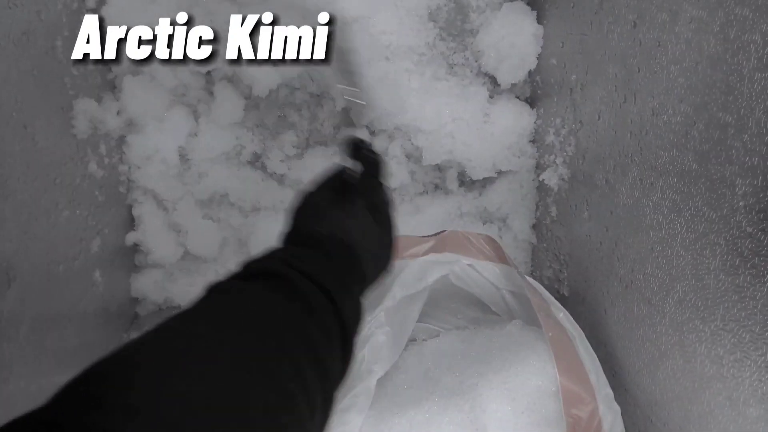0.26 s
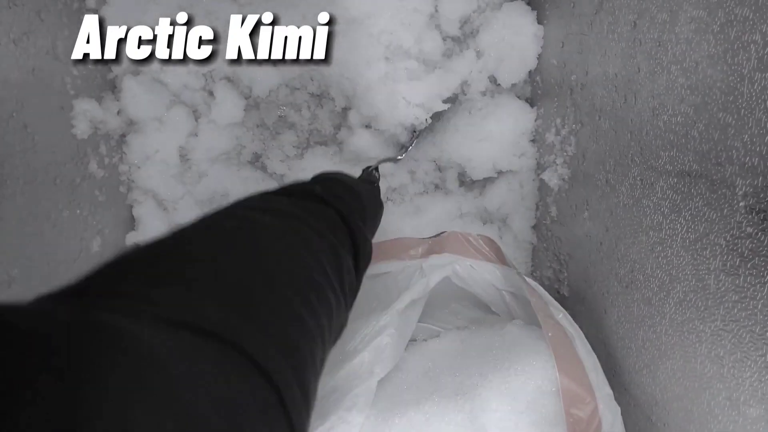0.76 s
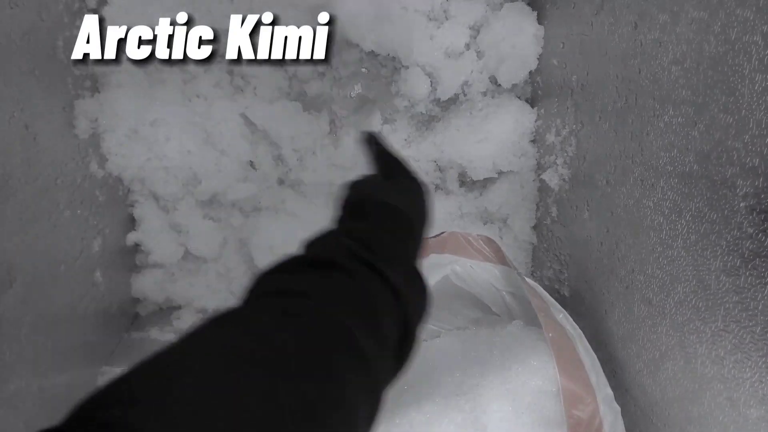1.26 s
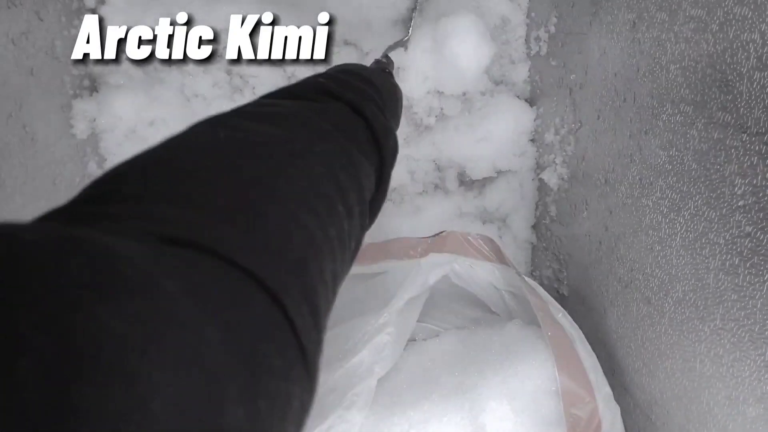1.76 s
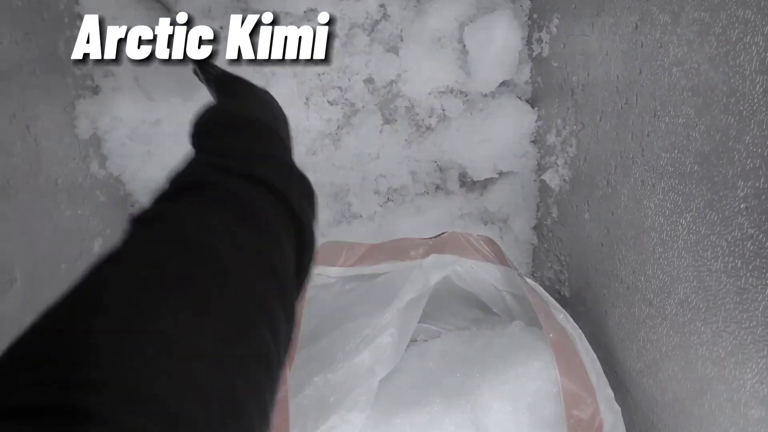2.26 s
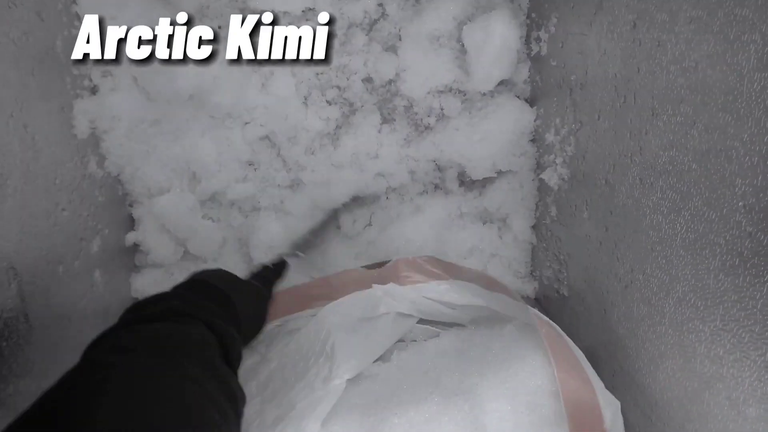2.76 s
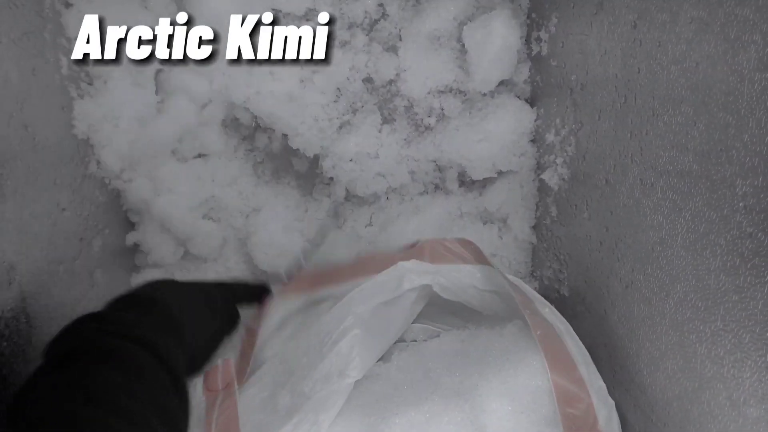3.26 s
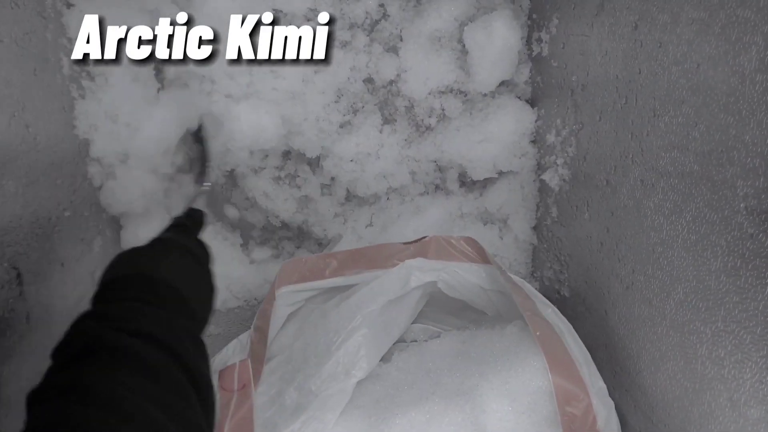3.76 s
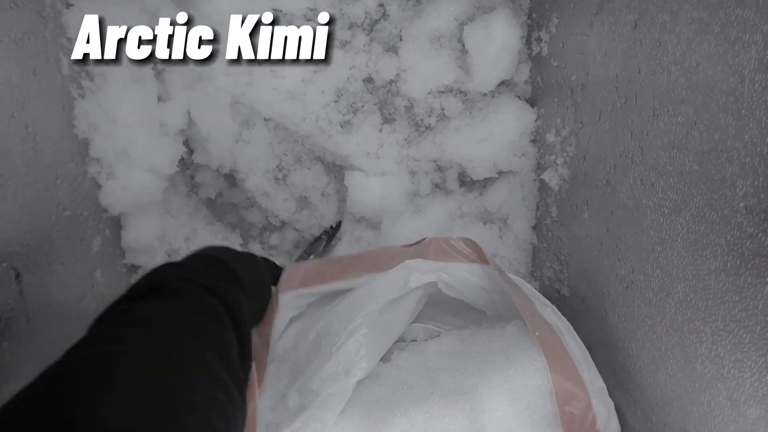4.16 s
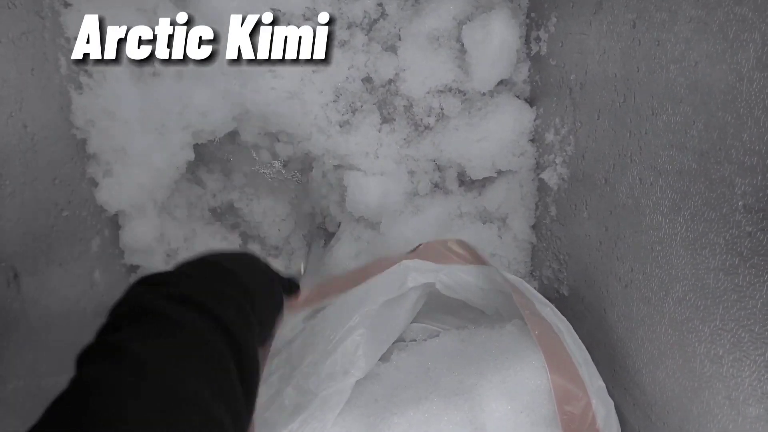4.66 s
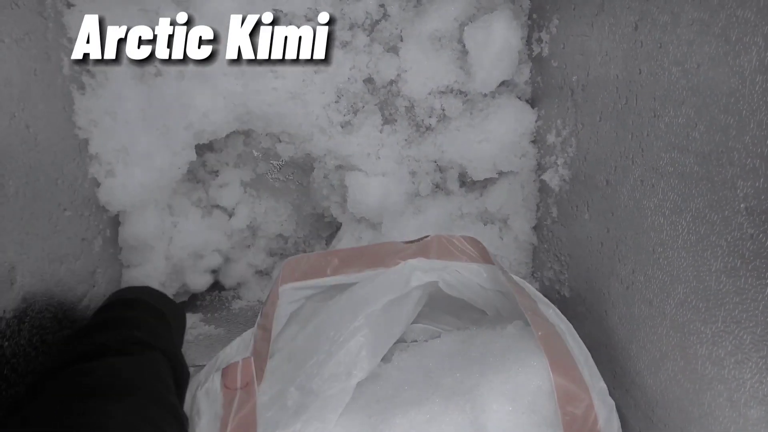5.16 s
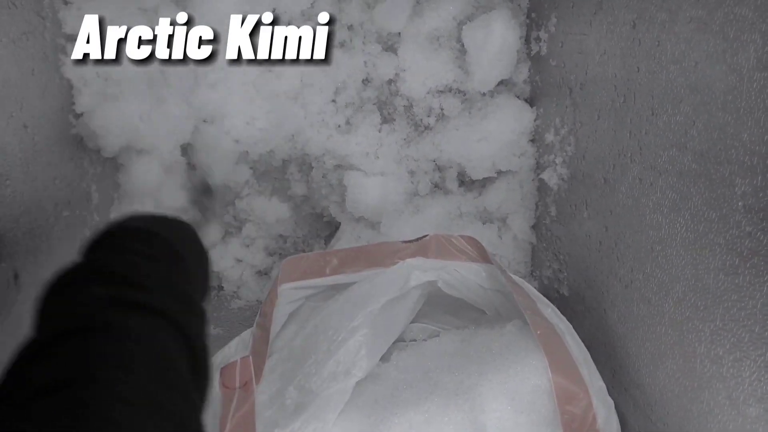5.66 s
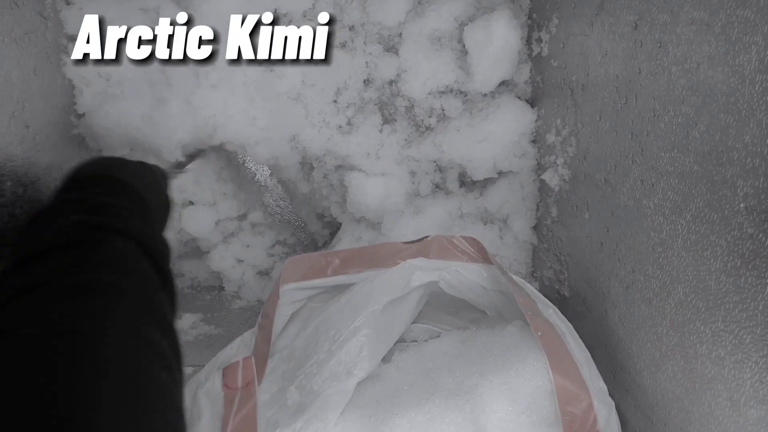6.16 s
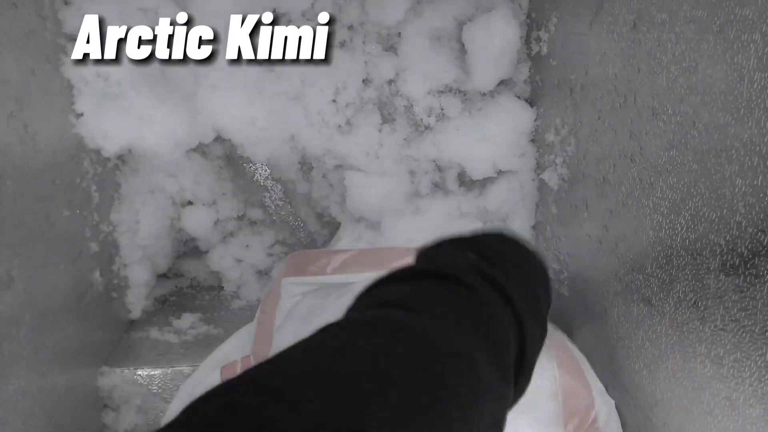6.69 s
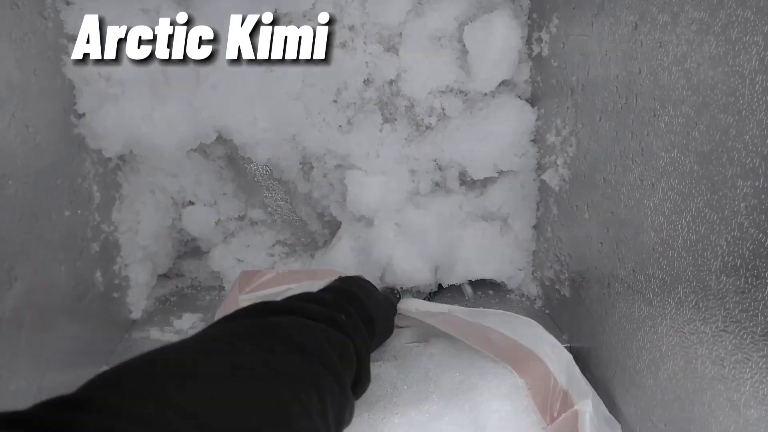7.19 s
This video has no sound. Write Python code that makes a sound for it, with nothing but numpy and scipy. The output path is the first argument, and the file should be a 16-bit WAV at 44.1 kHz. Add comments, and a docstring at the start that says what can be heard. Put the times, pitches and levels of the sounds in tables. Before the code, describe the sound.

Close stereo, inside a small hard-walled freezer with quiet room hiss and low handling rumble. From 0 to about 2.5 seconds a steel spoon scrapes frost off hard walls in fast uneven strokes: bright gritty hiss, fine snapping crumbs, hollow boxy knocks, low panel thumps, and short faint metallic rings around 0.7, 1.4 and 1.7. From 2.6 the spoon digs looser frost, with a long crisp scrape near 3 and a sharp crack with a knock around 3.5. Heavy crunching and a strong deep boom come at 4.2, another boom just before 5, then a hard crunching stroke at 5.1. Between 5.3 and 6.2 strokes continue with cracks and dull knocks; 6.3 to 6.7 is lighter, mostly small ticks. A clacking knock at 6.7 leads to the loudest bright ice cracks around 6.8 to 7.0, and crunchy scraping to the end, about 7.4.

```python
"""Inside a chest freezer, close to a two-port microphone, a steel spoon scrapes and digs thick frost.
Crystals crush in a dense hiss of grains, crumbs snap as short damped tones, lumps crunch and ice cracks
in decaying noise bursts. Knocks ring modes of the box air and lining, and the spoon rings faintly.
Shoves set the low wall panel booming over a rumble of handling and a quiet room; a limiter holds the peaks."""
import sys
import numpy as np
from scipy import signal
from scipy.fft import rfft, irfft, next_fast_len
from scipy.io import wavfile
from scipy.ndimage import uniform_filter1d, minimum_filter1d, map_coordinates

SR = 44100
rng = np.random.default_rng(int(sys.argv[2]) if len(sys.argv) > 2 else 0)


def unload_audio(sound):
    """Save the sound as a 16-bit wav file, at the path given as the first command line argument."""
    columns = np.transpose(np.atleast_2d(sound))
    # keep every value between -1 and 1, then stretch to whole-number steps
    steps = np.round(np.clip(columns, -1, 1) * 32767)
    wavfile.write(sys.argv[1], SR, steps.astype(np.int16))


N = 327663

# relative noise spectra of the room and of handling: pitch_hz, density_db
ROOM_SPECTRUM = [(15, -33), (25, -26), (258, -1), (410, -9), (705, -6.5), (1930, -47), (4720, -22),
                 (8810, -64), (15200, -10.5), (16500, -36)]
HANDLING_SPECTRUM = [(12, -57), (20, -48), (54, -8), (75, -6), (98, -19), (160, -120)]
ROOM_DB = -46
# shoves that set the wall panel booming: full_s, peak_db, pitch_hz, hold_s
SHOVES = [(0.002, -15, 87, 0.015), (0.113, -17, 86, 0.042), (0.288, -31, 90, 0.025),
          (0.501, -14, 91.5, 0.042), (0.583, -18, 89.4, 0.03), (0.615, -18.5, 91, 0.026),
          (0.74, -12.5, 94.2, 0.014), (0.937, -27.5, 93.6, 0.034), (1.018, -21.9, 91.7, 0.023),
          (1.105, -16.5, 93.3, 0.066), (1.2, -27, 90.3, 0.04), (1.35, -36, 81.8, 0.026),
          (1.52, -23.5, 93, 0.021), (1.59, -27, 92, 0.016), (1.777, -20.3, 89.4, 0.02),
          (1.899, -32.5, 88.8, 0.022), (1.977, -21, 91.4, 0.025), (2.178, -14.5, 89, 0.025),
          (2.313, -20, 88.8, 0.013), (2.464, -28.6, 94, 0.023), (2.707, -23.4, 92, 0.044),
          (2.796, -19, 99.4, 0.021), (2.89, -16, 94.8, 0.02), (2.943, -23.5, 91, 0.041),
          (3.11, -28.5, 87.7, 0.077), (3.267, -28.5, 88.6, 0.021), (3.43, -20.5, 92.3, 0.021),
          (3.552, -23, 96.7, 0.024), (3.634, -33, 89.8, 0.02), (3.71, -15.5, 86.7, 0.011),
          (3.793, -23.5, 90.2, 0.042), (3.916, -21.6, 89.6, 0.033), (4.032, -25.9, 90.7, 0.025),
          (4.108, -15.5, 89.6, 0.031), (4.227, -4.5, 94.5, 0.026), (4.309, -14, 94, 0.027),
          (4.383, -18.5, 96, 0.023), (4.451, -23.5, 89.6, 0.092), (4.773, -24.2, 89.8, 0.037),
          (4.962, -5, 88.8, 0.065), (5.233, -23.5, 92, 0.031), (5.36, -30, 87.1, 0.016),
          (5.506, -19.1, 90.9, 0.039), (5.645, -26.4, 90.3, 0.021), (5.845, -28, 90.5, 0.037),
          (5.955, -23, 89.5, 0.031), (6.088, -13, 99.3, 0.019), (6.182, -23, 93, 0.038),
          (6.322, -34, 89.2, 0.047), (6.741, -30, 86.9, 0.026), (6.828, -27, 85.3, 0.017),
          (7.022, -24, 94.5, 0.023), (7.101, -25.2, 92.1, 0.021), (7.189, -20.8, 92.8, 0.021),
          (7.301, -25, 80.0, 0.023)]
SHOVE_SWELL_S, SHOVE_FADE_S, PANEL_REST_DB = 0.018, 0.081, -45.5

# knocks on the lining: start_s, air_peak_db, favoured_pitch_hz, clack_db (over the air peak)
KNOCKS = [(0.066, -5.5, 330, -20), (0.089, -2.5, 300, -30), (0.495, -1.5, 280, -20), (0.515, -8, 286, -41),
          (0.738, -5.5, 260, -12), (0.877, -15.5, 268, -27), (1.1, -0.5, 238, -29), (1.112, -8, 292, -35),
          (1.51, -6, 277, -20.5), (1.534, -9.5, 258, -32), (1.725, -5, 238, -17.5), (2.139, -4.5, 295, -13),
          (2.163, -1.5, 260, -34.5), (2.33, -19, 271, -25), (2.43, -3.5, 325, -20), (2.785, -9, 114.3, -31),
          (3.076, -12.5, 261, -37), (3.221, -16.5, 263, -26), (3.47, -8.5, 519, -33),
          (3.531, -0.5, 510, -48), (4.088, -11, 157.6, -32), (4.219, -4, 116, -36), (4.286, -7, 116.6, -33),
          (4.312, -8, 116, -30), (4.349, -6, 268, -31), (4.395, -6, 406, -31), (4.763, -9, 480, -22),
          (4.892, -8, 429, -25), (4.934, -0.5, 264, -28), (5.082, -10.5, 312, -20), (5.459, -4, 373, -38),
          (5.59, -10, 253.4, -16.5), (5.938, -7.5, 485, -39), (6.086, -4.5, 116.3, -37),
          (6.123, -6.5, 298, -32), (6.145, -6.5, 248, -33), (6.17, -5.5, 536, -30), (6.727, -6, 360, -5.5),
          (6.816, -2, 510, -29), (7.097, -8, 520, -17)]
# air modes of the box, ringing freely: pitch_hz, level_db, free_t60_s
BOX_MODES = [(125, 0, 0.1), (154.6, -5, 0.13), (255.4, 0, 0.11), (292.7, -3, 0.13), (384.2, -1, 0.095),
             (524.5, 4, 0.062), (706, -4, 0.11), (917, 4, 0.057)]
# modes of the thin lining: pitch_hz, level_db, t60_s
LINING_MODES = [(1606, 15, 0.037), (2905, 6, 0.023)]
DAMPED = .85  # frost and glove shorten the ring of the box to this share of a free ring

# the spoon is jarred free and rings: start_s, level_db (added to that of each mode)
TINKS = [(0.5526, -43), (0.575, -32), (0.6587, -22), (1.3653, -18.5), (1.7105, -18), (4.767, -23),
         (6.762, -32), (6.9163, -32)]
# modes of the spoon: pitch_hz, level_db, t60_s
SPOON_MODES = [(4020, -23, 0.071), (5170, -5, 0.066), (7000, 4, 0.052), (9970, -5, 0.064),
               (12960, 9, 0.044)]

# ice cracks: start_s, level_db, body_db (over level), chip_pitch_hz, chip_db (over level)
CRACKS = [(0.1955, -26, -28, 2500, 28), (0.345, -17.5, -29, 6300, 10), (0.488, -18.5, 7.5, 2870, 13),
          (0.62, -23, 5.5, 1820, 2), (0.771, -23.5, 2, 6040, 8), (0.8303, -22, -20, 5300, -1),
          (0.8834, -21, -12, 2710, 12), (1.2993, -34, -18, 6500, 16.5), (1.367, -25.5, -30, 7520, 14.5),
          (1.427, -19, -33, 6740, 9), (1.478, -13.5, -9, 1820, 9.5), (1.497, -15.5, -13, 3450, 12),
          (1.508, -22.5, -7, 1760, 24.5), (1.5496, -18, -2.5, 1992, 11), (1.965, -19, -20, 5340, 12),
          (2.0981, -16, -20, 6390, 9), (2.4301, -18, -18, 3730, 11), (2.47, -31.5, -20, 4945, 1),
          (3.093, -14.5, -32, 2240, 14), (3.1683, -22, -24, 2265, 15.5), (3.386, -25.5, 11.5, 6500, 21),
          (3.471, -9.5, 9, 2890, 9), (3.533, -22, 16, 6110, 8), (3.5666, -12, -4, 4030, -2),
          (3.641, -17, -19, 4500, 19), (4.1497, -15, 4, 2870, 11), (4.2861, -17.5, 5, 1868, 9),
          (4.3137, -23.5, 4.5, 2435, 16), (4.5206, -21, -11, 3084, 17), (4.6092, -20, -30, 6350, 15.5),
          (4.6794, -18, -23, 6650, 6.5), (4.6986, -30, -26, 6300, 2), (4.7659, -17, 6, 4060, 7),
          (4.87, -22.5, 14, 3260, 9), (5.3627, -24, 12.5, 6520, -5), (5.557, -31, -25, 3974, 7),
          (5.5898, -10, -20, 2555, 9), (5.645, -21, -1, 2500, 4), (5.9387, -16.5, 2, 6580, 9.5),
          (6.384, -30, -30, 5000, 7), (6.4396, -24.5, -4.5, 2270, 3), (6.4819, -26, -30, 5030, -1.5),
          (6.548, -33, -27, 5000, -9), (6.7256, -17.5, 4, 2674, 1), (6.76, -32, -20, 5100, 6),
          (6.8116, -10, -2, 3080, 9), (6.933, -6, 9, 2920, 18), (6.9722, -11, 5, 1800, 12),
          (7.0114, -14, 12, 2490, 11), (7.1013, -18, 7, 1800, 15)]
SPLIT_T60, SHOWER_T60 = 0.012, 0.051  # s: the first sharp split, the shower of chips after it
CHIP_OCTAVES = 0.21  # half width of the band in which a chip sounds

# strokes of the spoon, from hard digs to light brushing: full_bite_s, swell_s, hold_s, fade_s,
# hiss_db (crystals), crunch_db (lumps), drag_db (on the lining), sizzle_db (over the hiss)
STROKES = [ (0.0, .01, 0.054, 0.18, -14.5, -26.5, -34, -0.5), (.25, 0.23, .01, 0.26, -22.5, -33, -30, 7),
           (.555, .006, 0.0028, 0.05, -24, -26.5, -23, 4.5), (.7, 0.082, .03, 0.043, -14, -26, -24, 1),
           (.77, 0.018, 0.07, .02, -39, -43, -42, 15), (.886, 0.0073, 0.083, 0.13, -11, -19.5, -24, 0),
           (1.087, .2, 0.004, .06, -14.5, -25.5, -26.5, 6),
           (1.209, 0.052, 0.0069, .08, -27, -41, -33.5, 9.5),
           (1.3, 0.048, 0.18, .02, -37.5, -43, -40.5, 10), (1.479, 0.012, 0.043, 0.047, -24, -28, -32, 1),
           (1.56, 0.025, 0.026, 0.082, -23.5, -27.5, -34, 1),
           (1.72, 0.17, 0.0057, 0.066, -14.5, -21, -29, 4.5),
           (1.93, 0.11, 0.0044, 0.054, -27.5, -37.5, -30, 4),
           (1.97, 0.012, 0.054, 0.16, -12, -17.5, -23.5, 2), (2.134, 0.14, 0.0076, .05, -14, -25.5, -25, 4),
           (2.231, 0.071, 0.02, 0.074, -23, -39, -27, 0.5),
           (2.339, 0.088, 0.014, 0.088, -25.5, -38, -31, 2.5),
           (2.43, 0.035, .005, 0.023, -21, -33, -37, -2), (2.68, 0.12, 0.014, 0.062, -22, -24, -27, 4.5),
           (2.82, 0.11, 0.061, 0.31, -20.5, -24, -25.5, 11),
           (2.96, 0.22, 0.0098, 0.17, -13.5, -39, -22, -4), (3.09, 0.091, 0.0095, 0.037, -12, -27, -20, -7),
           (3.171, 0.056, 0.076, 0.066, -21.5, -35, -36, 2), (3.28, 0.11, 0.091, .05, -33.5, -46, -40, 9),
           (3.389, 0.052, .02, 0.079, -28.5, -29, -24, 13),
           (3.47, 0.014, 0.024, 0.016, -19.5, -19.5, -15, 3), (3.559, 0.045, .05, 0.26, -16.5, -29, -26, 1),
           (3.713, 0.25, .01, 0.072, -16.5, -20.5, -20.5, 2),
           (3.95, 0.44, 0.033, 0.13, -20, -30.5, -28.5, 9),
           (4.1, 0.078, 0.043, 0.091, -20.5, -36, -27.5, 9),
           (4.205, 0.15, 0.017, 0.0098, -17.5, -12.5, -19.5, -1),
           (4.23, 0.0075, 0.069, .02, -42, -44, -33, -3), (4.316, 0.012, 0.071, 0.12, -16, -18, -18.5, 3.5),
           (4.42, 0.1, 0.015, 0.056, -17.5, -26, -26, -15), (4.53, .02, 0.0034, 0.087, -34, -49.5, -47, 7),
           (4.62, 0.095, 0.019, 0.12, -22, -42, -45, 9.5), (4.7, 0.16, 0.0058, 0.049, -22.5, -37, -36.5, 8),
           (4.766, 0.0098, 0.0044, 0.048, -19.5, -27, -25, 6),
           (4.873, 0.022, .06, .05, -17, -13.5, -23, 4.5), (5.08, 0.2, 0.0076, 0.018, -12, -15, -25, -2),
           (5.11, .01, .24, 0.013, -37, -46, -38, 2), (5.2, 0.044, 0.025, 0.075, -30.5, -30.5, -30.5, 4.5),
           (5.366, 0.016, 0.051, 0.17, -14.5, -25, -24, 4.5),
           (5.463, 0.081, 0.011, 0.061, -14.5, -34, -29, -4), (5.569, 0.037, 0.029, 0.13, -18, -32, -30, 3),
           (5.79, 0.31, 0.04, 0.15, -30, -37.5, -37.5, 8), (5.941, 0.0048, 0.0031, 0.026, -21, -25, -25, 0),
           (6.08, 0.1, 0.033, 0.13, -21.5, -19.5, -25, 6), (6.19, 0.13, 0.011, 0.05, -16.5, -19.5, -15, -1),
           (6.245, 0.19, 0.0081, 0.04, -18.5, -22, -35, 4), (6.3, .01, .245, 0.099, -38, -54, -69.5, 4.5),
           (6.73, 0.0066, 0.011, .07, -28, -41, -27, 1), (6.816, 0.024, 0.0081, 0.018, -22, -14, -38, -9),
           (6.93, 0.12, 0.064, 0.22, -14.5, -18, -23, -3), (7.16, 0.33, 0.0083, 0.053, -22, -18, -20, 1.5),
           (7.22, .02, 0.067, 0.017, -45, -55, -42, 8), (7.306, 0.018, .13, 0.082, -12.5, -16, -22, -1)]
# relative noise spectra of crushed crystals, broken lumps and drag on the lining: pitch_hz, density_db
CRYSTAL_SPECTRUM = [(710, -40), (1200, -12.5), (1520, -8), (2080, -4.5), (2640, 0.5), (3720, -1.5),
                    (4100, 1), (4430, -1.5), (6450, -0.5), (8360, -12), (12600, -3), (15100, -5.5),
                    (15800, -27.5)]
LUMP_SPECTRUM = [(280, -46), (480, -1.5), (590, -9.5), (673, -4), (896, -5), (1130, -8.5), (1700, -15),
                 (2210, -16), (3740, -120)]
DRAG_SPECTRUM = [(71, -10), (120, 0.5), (161, -9.5), (226, -2.5), (269, 0.5), (339, -2), (441, -8.5),
                 (560, -7), (730, -9), (1230, -120)]
SLOPE_DB = 20  # a swell climbs, and a fade drops, this much in its time
WALL_UNTIL_S = 2.55  # the edge first scrapes the hard walls, then digs loose frost
WALL_TILT_DB = 4.5  # per octave about 800 Hz: lumps broken off the wall sound higher

# likeness of the two ports: pitch_hz, correlation (1 is identical)
LIKENESS = [(60, 0.98), (300, 1), (700, 0.69), (1400, 0.15), (3000, 0.073), (6000, 0.031), (15000, 0.053)]
# the spoon crosses in front of the two ports: time_s, left_delay_ms
PORT_DELAY = [(0, -0.27), (1.3, -0.28), (2, .35), (2.9, 0.31), (3.2, -0.39), (3.6, 0.24), (5.3, 0.3),
              (5.7, -.3), (6.2, 0.35), (6.8, -0.51), (7.43, -.3)]
# response of the left port over the right: pitch_hz, difference_db
PORT_TILT = [(60, 1), (110, 2.0), (200, -1), (380, 6), (700, -0.5), (1290, -1), (2380, 3.5), (4400, -0.5),
             (8120, 2.5), (15000, 2.5)]
TOP_HZ = 15950
CONTROL_STEP = 32  # samples between values of a slow control


def amp(db):
    """Definition of the decibel: gain of a level in dB."""
    return 10 ** (np.asarray(db) / 20)


def unit(x):
    """Normalisation to unit rms pressure."""
    return x / np.sqrt(np.mean(x ** 2) + 1e-20)


def along(points, hz):
    """Interpolation of (Hz, value) points on a logarithmic frequency axis."""
    f, v = np.transpose(points)
    return np.interp(np.log(hz + 1), np.log(f + 1), v)


def per_sample(control):
    """Linear interpolation of a slow control to every sample."""
    return np.interp(np.arange(N) / CONTROL_STEP, np.arange(len(control)), control)


def wobble(rate):
    """Slow random modulation: a smooth curve through rate random knots a second."""
    knots = rng.standard_normal(int(N * rate / SR) + 4)
    return map_coordinates(knots, [np.arange(N) * rate / SR])


def filtered(x, response):
    """Linear filtering: the spectrum of x is multiplied by a response of frequency."""
    m = next_fast_len(N + SR // 2)
    return irfft(rfft(x, m) * response(np.fft.rfftfreq(m, 1 / SR)), m)[..., :N]


def grains(per_s, spread_db, life_s):
    """Shot noise: breaks at random moments, mostly small, decay in power to give an envelope of rms 1."""
    size_db = spread_db * np.minimum(rng.exponential(size=N), 4)
    breaks = (rng.random(N) < per_s / SR) * amp(size_db) ** 2
    power = signal.lfilter([1], [1, -np.exp(-2 / (life_s * SR))], breaks)
    return unit(np.sqrt(np.abs(power)))


def noise_pair(patchy_db):
    """Two independent white noises, sharing patches of random gain in time and frequency."""
    z = signal.stft(rng.standard_normal((2, N + 512)), nperseg=512)[2]
    field = uniform_filter1d(rng.standard_normal(z.shape[1:]), size=5, axis=0)
    field = uniform_filter1d(field, size=8, axis=1)
    return signal.istft(z * amp(patchy_db * unit(field)), nperseg=512)[1][:, :N]


def coloured(pair, spectrum):
    """Diffuse scattering in the box: shaped noise alike at both ports in the bass, unrelated in the treble."""
    def mid_side_response(hz):
        turn = np.arccos(np.clip(along(LIKENESS, hz), -1, 1)) / 2
        return amp(along(spectrum, hz)) * [np.cos(turn), np.sin(turn)]

    mid, side = filtered(pair, mid_side_response)
    return np.array([mid + side, mid - side])


def ringing(modes, t, scatter_db, rise_s=0.0012):
    """Modal superposition: one blow excites decaying sines at random strengths and phases, in two mixes."""
    hz, db, t60 = np.transpose(modes)[..., None]
    draw = rng.standard_normal((2, len(modes), 2))
    strength = amp(db + scatter_db * draw[..., :1] - 60 * t / t60)
    tones = strength * np.sin(2 * np.pi * hz * t + draw[..., 1:])
    return np.sum(tones, axis=1) * (1 - np.exp(-t / rise_s))


def pressure(s, swell, hold, fade):
    """Exponential growth and decay of the power of one push: it swells up to s, holds and fades."""
    t = np.arange(0, N + CONTROL_STEP, CONTROL_STEP) / SR - s
    before = np.maximum(-t, 0) / max(swell, .002)
    after = np.maximum(t - hold, 0) / max(fade, .005)
    return amp(-2 * SLOPE_DB * (before + after))


def room():
    """Stationary background noise: a quiet, slightly patchy coloured hiss."""
    return amp(ROOM_DB) * unit(coloured(noise_pair(patchy_db=3.5), ROOM_SPECTRUM))


def panel():
    """Low wall resonance: shoves add in power, the strongest dominates the note, and handling rumbles below."""
    power = np.array([amp(2 * db) / 2 * pressure(s, SHOVE_SWELL_S, hold, SHOVE_FADE_S)
                      for s, db, _, hold in SHOVES])
    total = power.sum(axis=0) + 1e-20
    # the note is the mean of the shove pitches, weighted by power
    hz = per_sample(np.transpose(SHOVES)[2] @ power / total)
    db = 10 * np.log10(per_sample(total) + amp(2 * PANEL_REST_DB))
    phase = 2 * np.pi * np.cumsum(hz + 3 * wobble(13)) / SR
    boom = np.sqrt(2) * np.sin(phase) * amp(1.3 * wobble(11))
    rumble = unit(coloured(noise_pair(patchy_db=0.0), HANDLING_SPECTRUM))
    # the rumble follows the boom at 0.37 dB per dB
    return amp(db) * boom + amp(0.37 * db - 26) * rumble


def knocks():
    """Selective modal excitation: a knock rings the air modes its place favours, and clacks on the lining."""
    out, t = np.zeros((2, N + SR)), np.arange(SR // 3) / SR
    for s, db, best_hz, clack_db in KNOCKS:
        # modes far from the favoured pitch are weakly driven
        held = [(hz, level - 14 * np.log2(hz / best_hz) ** 2, t60 * DAMPED) for hz, level, t60 in BOX_MODES]
        mid, side = ringing(held, t, scatter_db=1.5, rise_s=0.0034)
        side = amp(-27) * side
        air = np.array([mid + side, mid - side]) / np.max(np.abs(mid))
        clack = ringing(LINING_MODES, t, scatter_db=1.5)[0]
        start = round(s * SR)
        out[:, start:start + len(t)] += amp(db) * (air + amp(clack_db) * clack)
    return out[:, :N]


def spoon():
    """Free vibration of steel: a brief ring, each time with a new mix of its modes."""
    out, t = np.zeros((2, N + SR)), np.arange(SR // 4) / SR
    for s, db in TINKS:
        start = round(s * SR)
        out[:, start:start + len(t)] += amp(db) * ringing(SPOON_MODES, t, scatter_db=3)
    return out[:, :N]


def cracks():
    """Brittle fracture: a bright decaying burst, a band of noise at the chip's pitch and a duller body."""
    bright, body, chips = np.zeros(N + SR), np.zeros(N + SR), np.zeros((2, N + SR))
    t = np.arange(SR // 8) / SR
    for s, db, body_db, hz, chip_db in CRACKS:
        start = round(s * SR)
        at = slice(start, start + len(t))
        split = amp(2.0 - 60 * t / SPLIT_T60)
        shower = amp(-60 * t / SHOWER_T60)
        burst = amp(db) * (split + shower) * (1 - np.exp(-t / 0.00096))
        bright[at] += burst
        body[at] += amp(db + body_db) * shower * (1 - np.exp(-t / 0.0013))
        edges_hz = hz * 2 ** (CHIP_OCTAVES * np.array([-1, 1]))
        band = signal.butter(1, edges_hz, "bandpass", fs=SR)
        # the same chip noise reaches both ports
        chips[:, at] += amp(chip_db) * signal.lfilter(*band, burst * rng.standard_normal(len(t)))
    crystal_noise = unit(coloured(rng.standard_normal((2, N)), CRYSTAL_SPECTRUM))
    lump_noise = unit(coloured(rng.standard_normal((2, N)), LUMP_SPECTRUM))
    return bright[:N] * crystal_noise + body[:N] * lump_noise + chips[:, :N]


def strokes():
    """Addition of incoherent powers: gains of hiss, crunch and drag over the strokes, and of the sizzle."""
    rows = np.array(STROKES)
    push = np.array([pressure(*row[:4]) for row in rows])
    sizzle_db = rows[:, 4] + rows[:, 7]
    levels_db = np.c_[rows[:, 4:7], sizzle_db]
    hiss, crunch, drag, sizzle = amp(2 * levels_db).T @ push + 1e-12
    return [per_sample(np.sqrt(power)) for power in (hiss, crunch, drag, sizzle / hiss)]


def crumbs(per_s, pitch_hz, spread, cycles, spread_db):
    """Impulsive excitation of small bodies: crumbs snap as damped tones of random pitch, size and side."""
    at, size = rng.random((2, int(per_s * N / SR)))
    hz = pitch_hz * np.exp(spread * rng.standard_normal(len(at)))
    hz = np.clip(hz, 1200, 9000)[:, None]
    t = np.arange(400) / SR
    strength = amp(-spread_db * np.log(size + 1 / 30))[:, None]  # mostly small, a few large
    shape = np.exp(-t * hz / cycles) * (1 - np.exp(-t * hz))
    tone = strength * np.sin(2 * np.pi * hz * t) * shape
    spot = (at * N).astype(int)[:, None] + np.arange(len(t))
    lean = amp(5.2 * rng.standard_normal(len(at)))[:, None]  # toward the left or the right
    sides = [np.bincount(spot.ravel(), (tone * g).ravel(), minlength=N)[:N] for g in (lean, 1 / lean)]
    return unit(np.array(sides))


def scraping():
    """Granular friction: crystals crush finely, crumbs snap, lumps break coarsely, drag shakes the box air."""
    hiss_gain, crunch_gain, drag_gain, sizzle_gain = strokes()

    fine = grains(per_s=5700, spread_db=4.5, life_s=0.0076) * amp(2.47 * wobble(40))
    hiss = unit(coloured(fine * noise_pair(patchy_db=3.5), CRYSTAL_SPECTRUM))
    # the top of the hiss, above about 8 kHz, has its own gain
    sizzle = filtered(hiss, lambda hz: 1 / (1 + (8000 / (hz + 1)) ** 6))
    hiss = hiss + (sizzle_gain - 1) * sizzle
    snaps = crumbs(per_s=1200, pitch_hz=3000, spread=.4, cycles=4, spread_db=4)

    coarse = grains(per_s=600, spread_db=3.5, life_s=0.0071)
    loose = unit(coloured(coarse * noise_pair(patchy_db=3.0), LUMP_SPECTRUM))
    hard = unit(filtered(loose, lambda hz: amp(WALL_TILT_DB * np.log2((hz + 1) / 800))))
    crunch = np.where(np.arange(N) < WALL_UNTIL_S * SR, hard, loose)

    rough = grains(per_s=200, spread_db=3.0, life_s=0.012)
    drag = unit(coloured(rough * noise_pair(patchy_db=0.0), DRAG_SPECTRUM))
    return hiss_gain * (hiss + amp(-14.5) * snaps) + crunch_gain * crunch + drag_gain * drag


def scene():
    """Superposition and interaural-style delay: the sources add, and reach the two ports a little apart."""
    left, right = room() + panel() + knocks() + spoon() + cracks() + scraping()
    time_s, delay_ms = np.transpose(PORT_DELAY)
    delay = np.interp(np.arange(N) / SR, time_s, delay_ms)
    source = np.arange(N) - np.round(delay * SR / 1000)
    return np.array([left[np.clip(source, 0, N - 1).astype(int)], right])


def record(dry):
    """Port response, gain reduction and band limits: a fast limiter ducks around peaks."""
    # half the difference between the ports goes to each, with opposite signs
    x = filtered(dry, lambda hz: amp(along(PORT_TILT, hz) * [[.5], [-.5]]))
    # the limit lies 1.5 dB over full scale; the smoothed gain also dips just ahead of a peak
    need = np.minimum(1, amp(1.5) / (np.max(np.abs(x), axis=0) + 1e-9))
    gain = uniform_filter1d(minimum_filter1d(need, size=300), size=150)

    def band(hz):
        top = np.clip((TOP_HZ + 100 - hz) / 200, 0, 1) ** 2
        return top / (1 + (32 / (hz + 1)) ** 4)

    return filtered(x * gain, band)


dry = scene()
out = record(dry)
unload_audio(out)
```